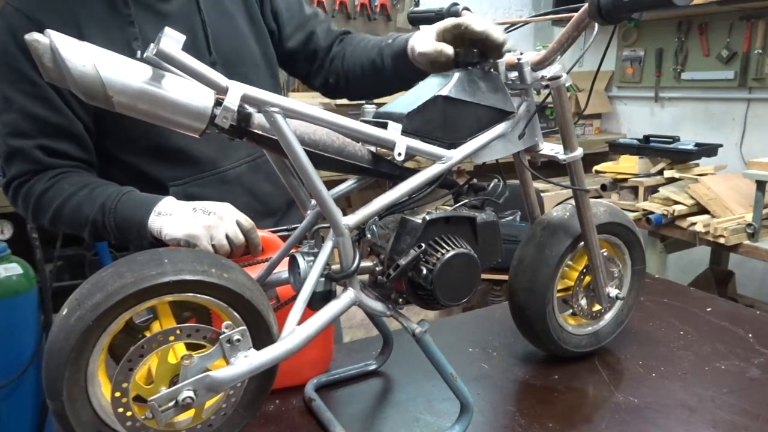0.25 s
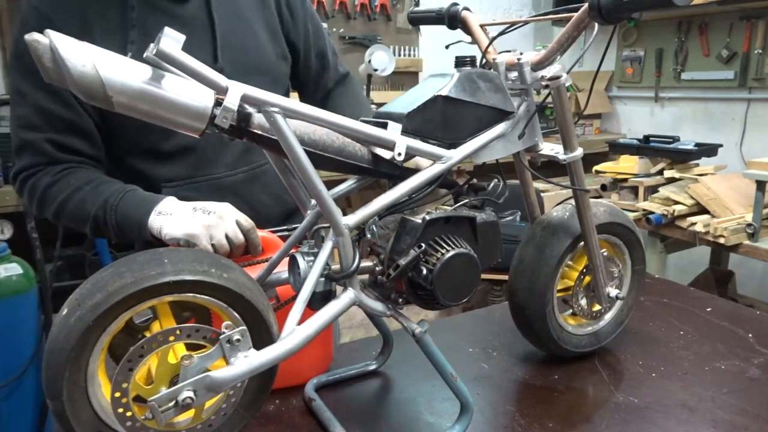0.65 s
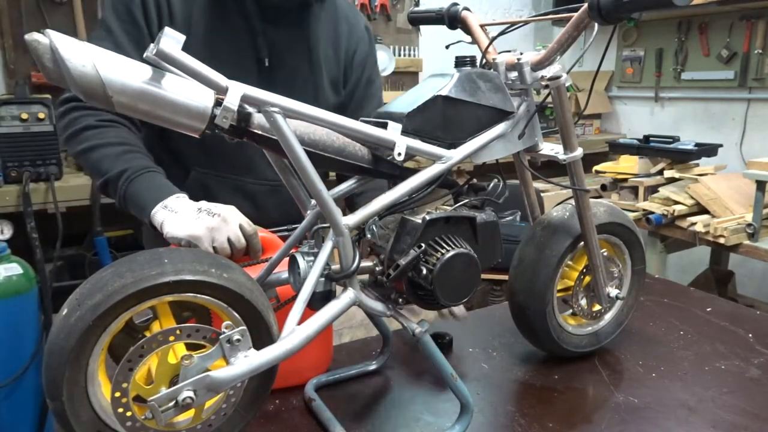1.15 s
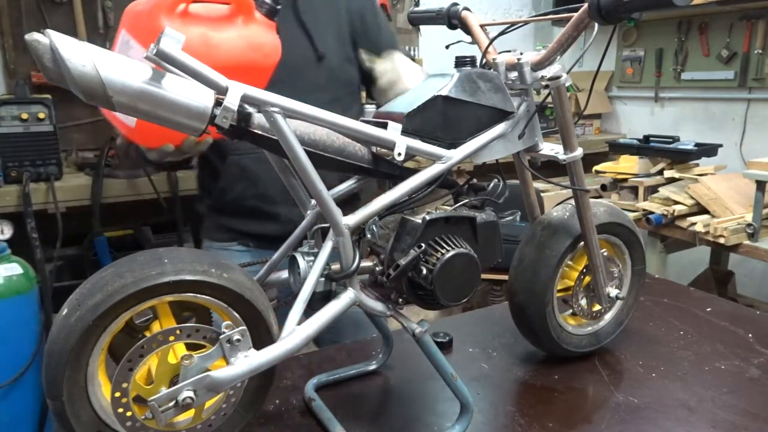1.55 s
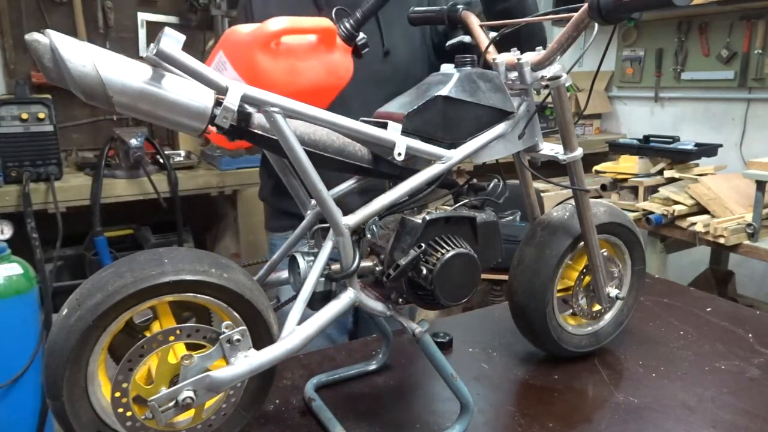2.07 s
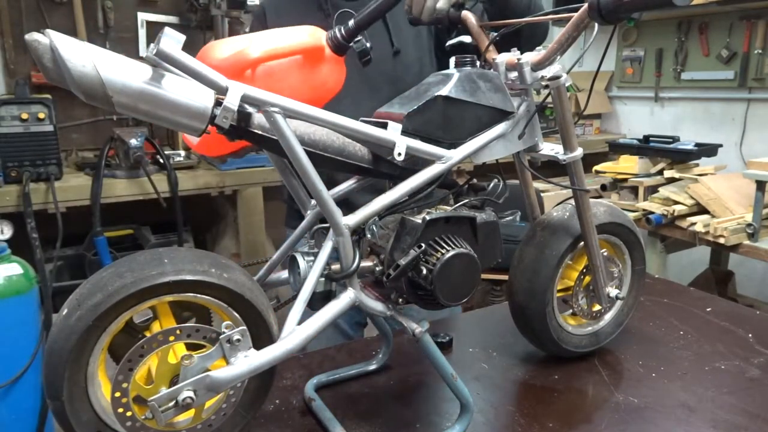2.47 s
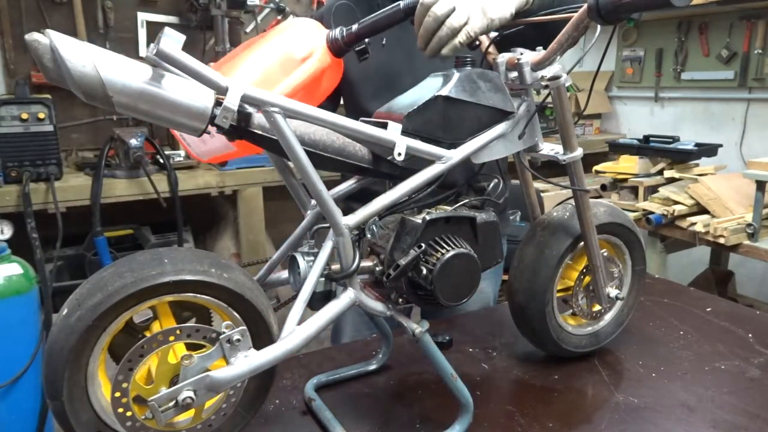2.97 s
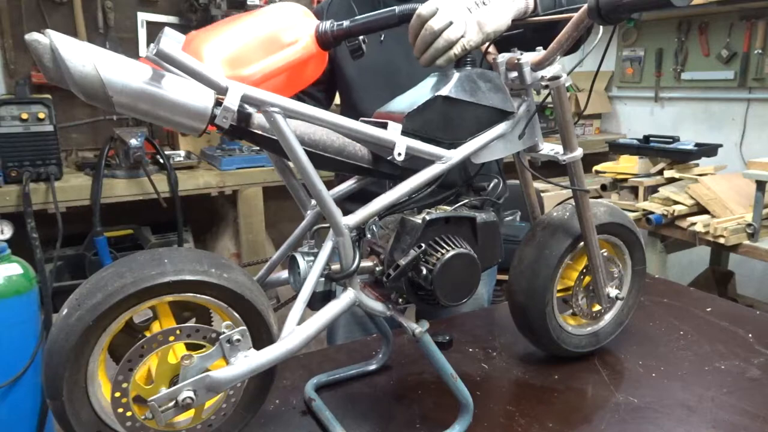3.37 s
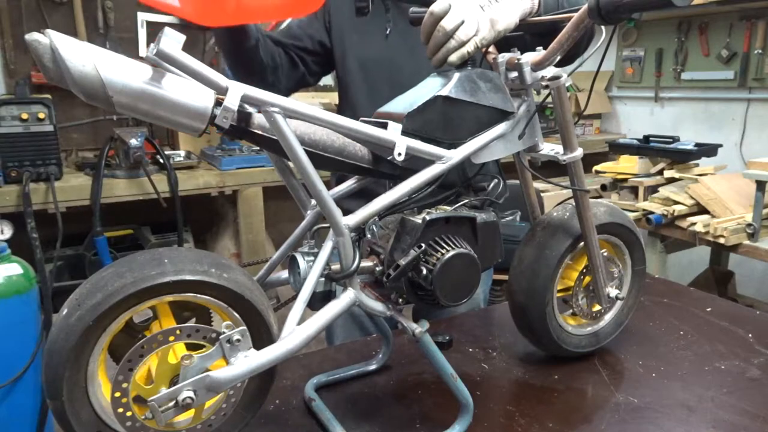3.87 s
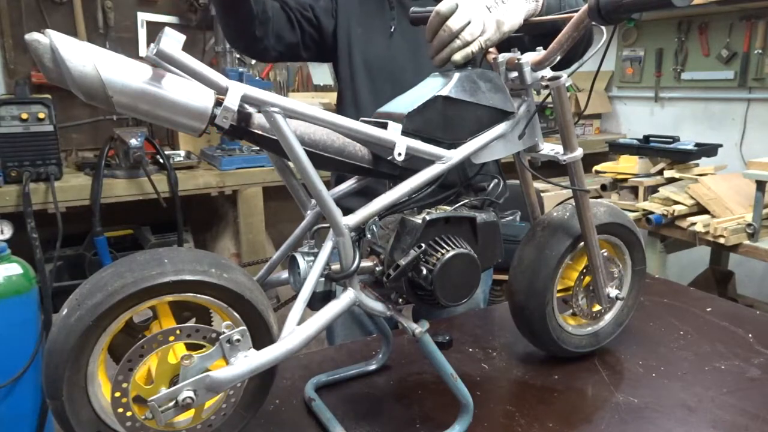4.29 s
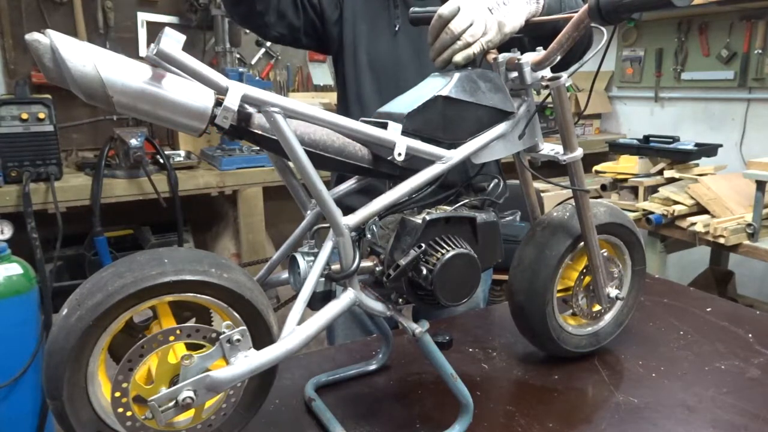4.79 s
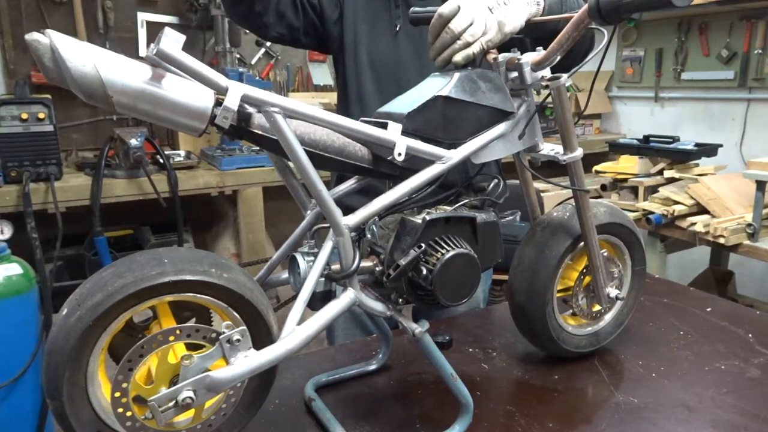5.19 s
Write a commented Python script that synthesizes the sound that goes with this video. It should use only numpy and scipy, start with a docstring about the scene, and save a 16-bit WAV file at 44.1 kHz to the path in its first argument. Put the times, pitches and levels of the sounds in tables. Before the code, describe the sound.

In a workshop, a plastic tank cap is jerked loose in quick hollow rattles, then lands with a loud cluster of bounces on a bench. The sound cuts to a hollow fuel can knocking sharply, sleeves rustling and a spout scraping. Small blips and a faint glug with bubbly splashing follow near the end. Low air rumble comes and goes under a constant thin electrical buzz and hiss; the microphone is close, with some room echo.

```python
"""A workshop: a plastic tank cap is unscrewed (jerks ring its modes, vented air is noise) and bounces on the bench.
At 1.327 s its ringing is cut; a fuel can knocks, short damped tones sound, and its spout is worked into the tank:
ringing modes and rubbing grains. Bright ticks follow; fuel glugs in rising tones and splashes as dense bubbles.
Until 3.5 s sleeves rustle now and then. Throughout, the air heaves slowly as low noise over room tone, and a
circuit's fast even ticks buzz under hiss."""
import sys
import numpy as np
from scipy import signal
from scipy.fft import rfft, irfft, next_fast_len
from scipy.io import wavfile
from scipy.ndimage import uniform_filter1d, map_coordinates

SR = 44100
rng = np.random.default_rng(int(sys.argv[2]) if len(sys.argv) > 2 else 0)


def wrap_up_sound(samples):
    """Save the sound to the file named by the first command line argument, as 16-bit audio."""
    columns = np.atleast_2d(samples).T
    # keep every value between -1 and 1, then stretch to whole-number steps
    tamed = np.clip(columns, -1, 1)
    steps = np.round(tamed * 32767).astype(np.int16)
    wavfile.write(sys.argv[1], SR, steps)


N = 240212
TIME_S = np.arange(N) / SR
CUT_S = 1.327  # the cap and its echoes stop, the can begins, the ticks restart


def cap():
    """A cap rubs and jerks in its thread while air vents, then drops and bounces; returns both stages."""
    # Modes of the cap on the tank. Each row: frequency in Hz, level in dB, t60 in seconds.
    tank_modes = [(451, -4, 0.036), (611, 5.5, 0.035), (746, -2.5, 0.043), (982, -0.5, 0.035),
                  (1134, -3.5, 0.021), (1580, -14.5, 0.057), (1850, -48, 0.041), (2790, -37, 0.024),
                  (5304, -29, 0.0087)]
    # Rubs in the thread. Each row: time in seconds, level in dB.
    twists = [(.02, -41.5), (.1, -36), (.23, -45.5), (.38, -44.5)]
    # Jerks of the thread. Each row: time in seconds, level in dB, brightness in dB per octave.
    jerk_blows = [(0.067, -24, 11), (0.114, -26, 4.5), (0.133, -26, 6.5), (0.218, -17, 5),
                  (0.243, -28, -2.5), (0.269, -37.5, 2.5), (0.357, -30, -8), (0.376, -24.5, -1.5),
                  (0.409, -35, -12.5)]
    # Colour of the escaping air. Each row: frequency in Hz, relative density in dB.
    vent_colour = [(880, 1.5), (1500, -10.5), (3370, -14), (4290, -3.5), (5670, -15.5), (6300, -13.5),
                   (9820, -19), (15000, -34.5)]
    # Bounces on the bench. Each row: time in seconds, level in dB.
    bounces = [(0.9974, -6), (1.011, -6), (1.0269, -6), (1.0328, -16.5), (1.0539, -16.5), (1.064, -14)]
    # Colour of the bounce. Each row: frequency in Hz, relative level in dB.
    bench_colour = [(59, -58.5), (100, -31), (361, -6.5), (442, -17), (588, -3.5), (692, -10), (751, -4),
                    (1560, 0.5), (2210, -8.5), (3830, -12), (8310, -41.5), (13000, -74.5)]

    rub_grains = grains(1200, 2.5, widths(tank_modes, damping=7.2))
    rub = swells(twists, rise=230, fall=210) * rub_grains
    vent = amp(-35 - 235 * TIME_S) * noise(vent_colour)
    jerks = struck(jerk_blows, tank_modes, scatter_db=0.97, detune=0.03, contact_s=0.00114, rough=0.06)
    dropped = np.zeros(N)
    for start_s, level_db in bounces:
        add(dropped, start_s, amp(level_db) * clack(bench_colour, lag_hz=1750, lag_width_hz=3000))
    return rub + vent + jerks, dropped


def clack(colour, lag_hz, lag_width_hz):
    """A causal pulse of given colour, by folding the cepstrum; the thin shell answers after the first push."""
    hz = np.fft.rfftfreq(4096, 1 / SR)
    cepstrum = irfft(np.log(amp(along(colour, hz)) + 1e-6))
    folded = np.r_[cepstrum[0], 2 * cepstrum[1:2048], np.zeros(2048)]
    minimum_phase = np.exp(rfft(folded))
    lag = lag_hz ** 2 - hz * hz + 1j * hz * lag_width_hz
    all_pass = np.conj(lag) / lag
    pulse = irfft(minimum_phase * all_pass)[:2048]
    return pulse / np.abs(pulse).max()


def can():
    """A hollow can knocks, gloves scuff its skin, the spout scrapes in its neck; short bright ticks follow."""
    # Modes. Each row: frequency in Hz, level in dB, t60 in seconds.
    can_modes = [(163.6, -24, 0.063), (424, 2, 0.05), (768, -10.5, 0.015), (818, 7.5, 0.034),
                 (996, -16.5, 0.14), (1485, -6.5, 0.015), (2363, -16, 0.037), (3190, -24, 0.03),
                 (4970, -21.5, 0.02), (5846, -18, 0.013), (7460, -24, 0.0104), (10110, -25, 0.0083),
                 (12770, -22, .006)]
    neck_modes = [(237, -8, 0.051), (790, 13, 0.027), (920, -1, .02), (1031, 4.5, 0.11), (1887, -6, 0.029),
                  (2480, -8.5, 0.012), (2730, -18.5, 0.021), (5470, -35, 0.0092)]
    tick_modes = [(1386, -12.5, 0.095), (1760, -6.5, 0.12), (2470, -20, 0.11), (3260, -11.5, 0.095),
                  (3900, -20, 0.13), (5080, -9, 0.058), (5960, -15, 0.083)]
    # Blows. Each row: time in seconds, level in dB, brightness in dB per octave.
    knock_blows = [(1.357, -24.5, -1), (1.797, -18, 3.5), (1.807, -22.5, -3.5), (2.098, -45, -5),
                   (2.277, -37, -11), (2.428, -33, -1.5), (2.519, -37.5, 0.5), (4.854, -42, -3.5),
                   (4.91, -41, -2)]
    spout_blows = [(2.645, -37, -3.5), (2.677, -30.5, 10), (2.697, -36, 8.5), (2.714, -40.5, 7),
                   (2.76, -32, -2.5), (2.792, -37.5, -7.5), (2.814, -39, -5)]
    tick_blows = [(4.1642, -49.5, -4), (4.235, -57.5, 11.5), (4.7391, -49, 0), (4.7654, -50.5, 10)]  # the last two fall within the splash
    # Spout rubs, then glove scuffs. Each row: time in seconds, level in dB.
    shoves = [(2.58, -59), (2.7, -48), (2.79, -49), (2.86, -53)]
    scuffs = [(1.345, -44.5), (1.78, -55.5), (2.11, -54), (2.27, -57), (2.44, -60.5), (2.53, -54),
              (4.78, -63), (4.87, -57), (4.95, -60.5)]
    # Broad hiss of a scuff. Each row: frequency in Hz, relative density in dB.
    skin_colour = [(1500, -30), (3000, -5), (8000, 0), (15000, -17)]

    knocks = struck(knock_blows, can_modes, scatter_db=2.4, detune=0.017, contact_s=0.0011, rough=0.045,
                    crack_on=True)
    lower_modes = can_modes[:len(can_modes) // 2]
    skin = grains(900, 2.0, widths(lower_modes, damping=6.2)) + amp(-21) * noise(skin_colour)
    scuffing = swells(scuffs, rise=550, fall=230) * skin
    rub = swells(shoves, rise=154, fall=550) * grains(900, 3.8, widths(neck_modes, damping=5.6))
    spout = struck(spout_blows, neck_modes, scatter_db=2.8, detune=0.022, contact_s=0.00073, rough=0.023)
    bright_ticks = struck(tick_blows, tick_modes, scatter_db=0.73, detune=0.013, contact_s=0.0018, rough=0.0097)
    return knocks + scuffing + rub + spout + bright_ticks


def fuel():
    """The can gulps air; the splash is dense bubbles in the tank's resonances."""
    # Gulps. Each row: time in seconds, level in dB, starting pitch in Hz, hold in seconds.
    gulp_rows = [(4.68, -49.5, 250, 0.066), (4.765, -49.5, 214, 0.013)]
    # Fuel landing. Each row: time in seconds, gurgle level in dB, fizz level in dB, hold in seconds.
    surges = [(4.7, -60.5, -71, 0.021), (4.76, -56.5, -66, 0.03), (5.08, -73.5, -84, 0.023),
              (5.31, -74, -81, 0.017)]
    # Resonances. Each row: frequency in Hz, width in Hz, level in dB.
    gurgle_peaks = [(493, 440, -0.5), (1680, 140, -2), (2380, 470, -5), (3110, 480, -4.5),
                    (4030, 270, -12.5)]
    fizz_peaks = [(5340, 590, 2.5), (5790, 490, 5.5), (8160, 1000, -5.5), (10200, 1400, -4.5)]

    gulping = sum(gulp(*row) for row in gulp_rows)
    gurgle_gain = swells(surges, rise=350, fall=123, held=True) * amp(2.3 * wobble(27))
    fizz_gain = swells(surges, rise=155, fall=34, axis=2, held=True) * amp(3.2 * wobble(25))
    gurgle = gurgle_gain * grains(1800, 1.9, gurgle_peaks)
    fizz = fizz_gain * grains(4400, 6.9, fizz_peaks)
    return gulping + gurgle + fizz


def gulp(start_s, level_db, start_hz, hold_s):
    """A wavering low bubble tone that climbs as it nears the surface."""
    climb_per_s = 2.25  # share of the starting pitch
    climb = 1 + climb_per_s * np.clip(TIME_S - start_s, 0, 1)
    pitch_hz = start_hz * climb * (1 + 0.05 * wobble(60))
    gain = swells([(start_s, level_db, hold_s)], rise=1100, fall=340, held=True) * amp(2 * wobble(70))
    return gain * np.sin(2 * np.pi * np.cumsum(pitch_hz) / SR)


def short_tones():
    """Short damped, wavering tones, from low to a few faint very high blips."""
    # Each row: time in seconds, peak in dB, frequency in Hz, t60 in seconds.
    tone_rows = [(1.469, -48, 4300, 0.014), (1.535, -58.5, 2520, 0.013), (2.94, -45.5, 1500, 0.015),
                 (3.125, -52.5, 732, 0.09), (3.329, -53, 740, 0.041), (3.912, -52.5, 591, 0.16),
                 (4.085, -59.5, 11200, 0.043), (4.1, -47.5, 607, 0.071), (4.268, -64, 10450, 0.097),
                 (4.573, -59.5, 3660, 0.074), (4.595, -60.5, 3480, 0.098), (4.674, -49, 796, 0.022),
                 (4.797, -53.5, 10900, 0.016), (5.082, -58.5, 2900, 0.043)]
    out = np.zeros(N)
    for start_s, peak_db, hz, t60_s in tone_rows:
        out += struck([(start_s, peak_db, 0)], [(hz, 0, t60_s)], scatter_db=0, detune=0.004,
                      contact_s=0.002, rough=0.025)
    return out


def cloth():
    """Each arm move drags two weaves over each other: many small impacts through their resonances."""
    # Arm moves. Each row: time in seconds, swish level in dB, thin swish level in dB, hold in seconds.
    sleeves = [(.56, -65, -85, 0.1), (.8, -73.5, -85, 0.37), (1.5, -68.5, -79, 0.026),
               (1.59, -66, -72.5, 0.058), (1.8, -64, -80.5, 0.013), (2.12, -70, -69, 0.027),
               (2.27, -69, -76, .04), (2.62, -89, -67, 0.072), (2.88, -81.5, -72, 0.043),
               (3.12, -89, -78.5, .03), (3.52, -75.5, -83.5, 0.018)]
    # Resonances. Each row: frequency in Hz, width in Hz, level in dB.
    weave = [(1780, 400, -5.5), (3380, 220, -9), (4260, 860, -4.5)]
    thin_weave = [(5100, 620, -3.5), (5740, 620, 0), (7140, 1500, -12)]

    swish_gain = swells(sleeves, rise=260, fall=160, held=True) * amp(2.07 * wobble(48))
    thin_gain = swells(sleeves, rise=260, fall=160, axis=2, held=True) * amp(2.9 * wobble(43))
    return swish_gain * grains(3014, 1.7, weave) + thin_gain * grains(3000, 3.0, thin_weave)


def bench():
    """The bench shudders: small impacts through its low resonances."""
    # Each row: time in seconds, level in dB.
    shudders = [(.056, -45.5), (.18, -56), (4.766, -52.5)]
    # Each row: frequency in Hz, width in Hz, level in dB.
    bench_peaks = [(66.6, 56, 2), (95, 36, 2), (190, 23, -4)]
    return swells(shudders, rise=430, fall=134) * grains(900, 1.5, bench_peaks)


def air():
    """Slow pressure swings are very low noise with a drawn level; room tone is steadier noise."""
    # Level of the swings. Each row: time in seconds, level in dB.
    heave = [(0.0, -39), (0.09, -27), (0.2, -52.5), (0.59, -58), (0.77, -34.5), (0.92, -61), (0.98, -38.5),
             (1.29, -68.5), (1.71, -31), (2.26, -39), (2.58, -59.5), (2.71, -36.5), (3.17, -59),
             (5.45, -63)]
    # Colours. Each row: frequency in Hz, relative density in dB.
    swing_colour = [(1, -21.5), (3, 4), (12, -4), (22, -13.5), (35, -24.5), (60, -51), (100, -120)]
    hush_colour = [(18, -25), (30, -12), (107, -7.5), (130, -16), (245, -8), (297, -12.5), (334, -12.5),
                   (572, -15), (694, -17), (981, -24), (1140, -22), (3000, -41.5), (3900, -58.5),
                   (6600, -120)]

    heave_s, heave_db = np.transpose(heave)
    swing_gain = amp(np.interp(TIME_S, heave_s, heave_db, -200, -200))
    hush_gain = amp(-63.5 + 0.75 * wobble(2))
    return swing_gain * noise(swing_colour) + hush_gain * noise(hush_colour)


def buzz():
    """A circuit's sharp ticks, the edges of a square wave: one up, the next down, over hiss."""
    tick_hz = 73.2193
    first_s, restart_s = 0.00535, 1.33636  # first tick before and after the cut
    # Common level of ticks and hiss. Each row: time in seconds, level in dB.
    buzz_level = [(0, -45.5), (.9, -52), (1.328, -47.5), (1.999, -50.5), (2.8, -48), (3.2, -51.5),
                  (4.399, -51), (4.8, -47), (5.45, -50.5)]
    # Colours. Each row: frequency in Hz, relative level in dB.
    tick_colour = [(500, -29), (2000, -3), (4000, -6), (5700, -1), (7500, -8), (9700, -3.5), (12200, -5.5),
                   (13000, -1), (15300, -2), (17000, -14)]
    hiss_colour = [(1500, -21.5), (3000, -3.5), (5500, -3), (7500, -8), (10000, -2.5), (12200, -2),
                   (15800, -3.5)]

    steps_s = np.arange(int(N / SR * tick_hz)) / tick_hz
    before_s = first_s + steps_s
    tick_s = np.concatenate([before_s[before_s < CUT_S], restart_s + steps_s])
    # windowed sinc: ticks fall between samples
    at = tick_s[:, None] * SR
    near = np.floor(at).astype(int) + np.arange(-7, 9)
    sign = -(-1) ** np.arange(len(tick_s))[:, None]
    strength = amp(rng.standard_normal(at.shape))  # 1 dB scatter
    shape = np.sinc(near - at) * np.cos((near - at) * np.pi / 16) ** 2
    impulses = np.bincount(near.ravel(), (sign * strength * shape).ravel(), 2 * N)[:N]
    ticks = filtered(impulses, lambda hz: amp(along(tick_colour, hz)))
    level_s, level_db = np.transpose(buzz_level)
    return amp(np.interp(TIME_S, level_s, level_db)) * (ticks * 3 + amp(-27) * noise(hiss_colour))


def room(x):
    """Each frequency of the workshop's answer dies at its own speed; the first echoes come in lumps."""
    # Each row: frequency in Hz, t60 in seconds.
    walls = [(150, 0.84), (500, 0.42), (1500, 0.5), (4000, 0.48), (9000, 0.4)]
    hz, frame_s, bins = signal.stft(rng.standard_normal(SR), SR, nperseg=256)
    decay = amp(-60 * frame_s / along(walls, hz)[:, None])
    tail = signal.istft(bins * decay, SR, nperseg=256)[1]
    t = np.arange(len(tail)) / SR
    onset = 1 - np.exp(-t / 0.0034)
    lumps = amp(4 * wobble(500)[:len(t)] * np.exp(-t / 0.12))
    tail = tail * onset * lumps
    return signal.fftconvolve(x, tail / np.linalg.norm(tail))[:N]


def struck(blows, modes, scatter_db, detune, contact_s, rough, crack_on=False):
    """Each blow rings the modes at new strengths and pitches; each ring wavers in pitch and level."""
    out, t = np.zeros(N + SR), np.arange(SR // 5) / SR
    hz, mode_db, t60_s = np.transpose(modes)[:, :, None]
    for start_s, level_db, bright_db in blows:
        tilt_db = bright_db * np.log2(hz / 1000)
        gain_db = mode_db + tilt_db + scatter_db * rng.standard_normal(hz.shape)
        waver = rng.standard_normal((2, len(hz), len(t)))
        waver = unit(uniform_filter1d(uniform_filter1d(waver, 130), 130))
        pitch_hz = hz * (1 + detune * rng.standard_normal(hz.shape) + rough * waver[0])
        onset = (1 - np.exp(-t / contact_s)) ** 2
        swell = onset * amp(gain_db - 60 * t / t60_s + 4.3 * waver[1])
        cycles = np.cumsum(pitch_hz, 1) / SR + rng.random(hz.shape)
        sound = (swell * np.sin(2 * np.pi * cycles)).sum(0)
        sound /= np.abs(sound).max()
        if crack_on:  # first touch: a short noise burst
            burst = np.diff(uniform_filter1d(rng.standard_normal(len(t) + 3), size=3))[:len(t)]
            sound += amp(-21 + 2 * bright_db - 60 * t / 0.0076) * burst
        add(out, start_s, amp(level_db) * sound)
    return out[:N]


def grains(rate_hz, spread_db, peaks):
    """Random little impacts through resonances, each applied twice for dark valleys; rms 1."""
    hits = (rng.random(N) < rate_hz / SR) * rng.standard_normal(N) * amp(spread_db * rng.standard_normal(N))

    def body(f):
        response = 0
        for hz, width_hz, db in peaks:
            resonance = 1j * f * width_hz / (hz * hz - f * f + 1j * f * width_hz)
            response = response + amp(db) * resonance ** 2
        return response

    return unit(filtered(hits, body))


def widths(modes, damping):
    """Ringing modes as resonances, widened by the touch that rubs them."""
    return [(hz, damping / t60_s, db) for hz, db, t60_s in modes]


def swells(rows, rise, fall, axis=1, held=False):
    """Gain rising and falling straight in dB (slopes in dB per s); held rows stay up for their last column."""
    gain = np.zeros(N)
    for row in rows:
        hold_s = row[-1] if held else 0
        climb_db = rise * np.clip(row[0] - TIME_S, 0, 1)
        drop_db = fall * np.clip(TIME_S - row[0] - hold_s, 0, 2)
        gain += amp(row[axis] - climb_db - drop_db)
    return gain


def noise(colour):
    """Gaussian noise of given colour, rms 1."""
    return unit(filtered(rng.standard_normal(N), lambda hz: amp(along(colour, hz))))


def wobble(rate_hz):
    """A smooth random curve through rate_hz knots a second."""
    knots = rng.standard_normal(int(N * rate_hz / SR) + 4)
    return map_coordinates(knots, [np.arange(N) * rate_hz / SR])


def filtered(x, response):
    """x through a complex response of frequency."""
    size = next_fast_len(N + SR)
    return irfft(rfft(x, size) * response(np.fft.rfftfreq(size, 1 / SR)), size)[:N]


def along(points, hz):
    """Interpolates (Hz, value) points on a log frequency axis."""
    f, value = np.transpose(points)
    return np.interp(np.log(hz + 1), np.log(f + 1), value)


def amp(db):
    """Decibels to amplitude."""
    return 10 ** (np.asarray(db) / 20)


def unit(x):
    """Scales to rms 1."""
    return x / np.sqrt(np.mean(x ** 2) + 1e-20)


def add(track, start_s, sound):
    """Mixes a sound into the track at its start time."""
    track[round(start_s * SR):][:len(sound)] += sound


def scene():
    """The cap in its room up to the cut; can, fuel, tones and cloth in theirs; over bench, air and buzz."""
    shade_hz = 4070  # the bike shades the straight path from the bench above this
    turning, dropped = cap()
    shaded = filtered(dropped, lambda hz: (1 + 1j * hz / shade_hz) ** -2)
    early = turning + amp(-7.5) * room(turning) + shaded + amp(1.0) * room(dropped)
    past_s = TIME_S - CUT_S
    early = early * np.clip(-past_s / 0.0028, 0, 1)
    handled = can() * np.clip(past_s / 0.0041, 0, 1)
    soft = fuel() + short_tones() + cloth()
    late = handled + amp(-10) * room(handled) + soft + amp(-10) * room(soft)
    return (early + late + bench() + air() + buzz())[None]


def record(dry):
    """Nothing passes above the band limit."""
    top_hz = 15830
    return filtered(dry[0], lambda hz: hz < top_hz)[None]


dry = scene()
out = record(dry)
wrap_up_sound(out)
```